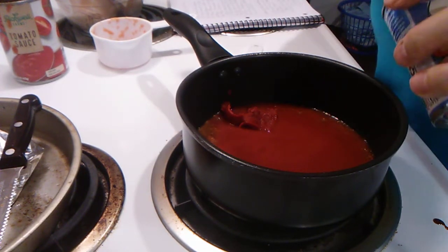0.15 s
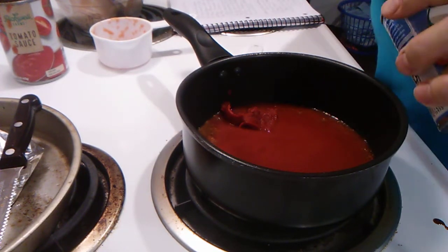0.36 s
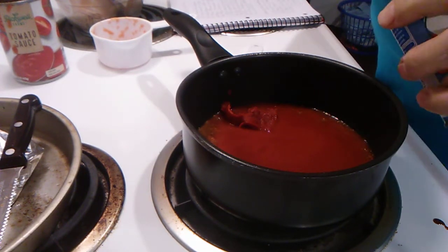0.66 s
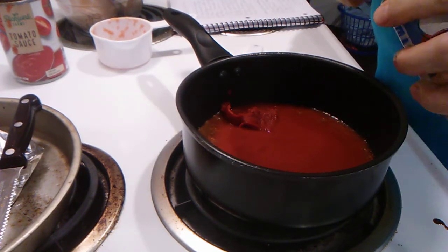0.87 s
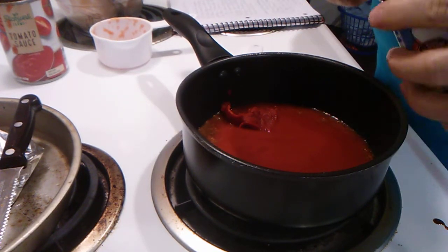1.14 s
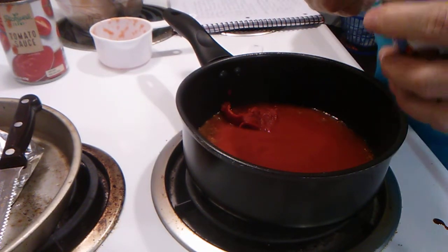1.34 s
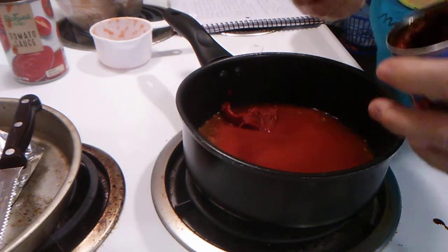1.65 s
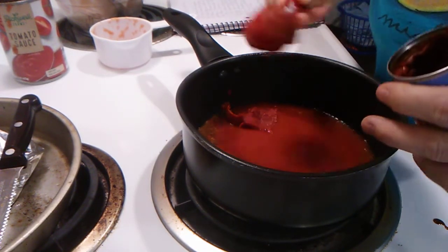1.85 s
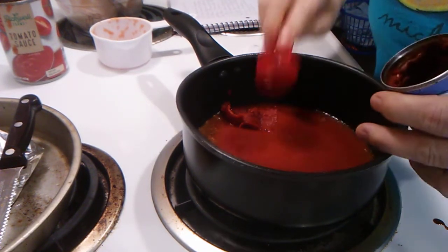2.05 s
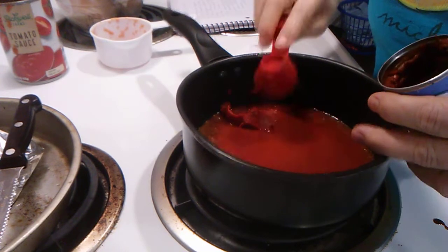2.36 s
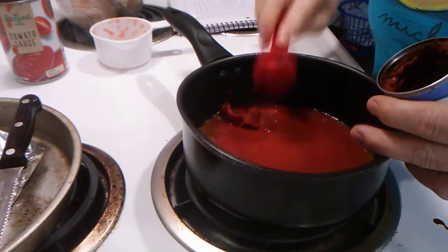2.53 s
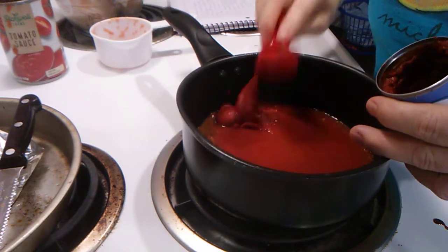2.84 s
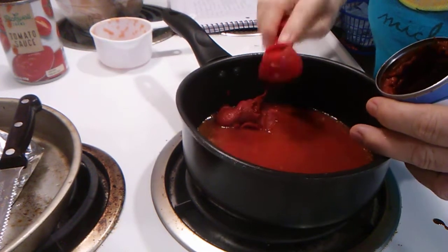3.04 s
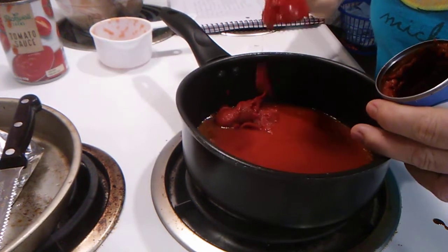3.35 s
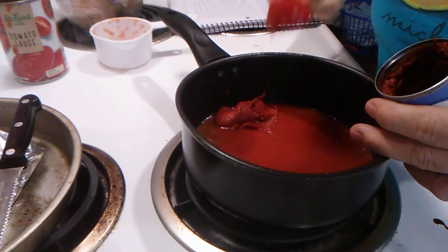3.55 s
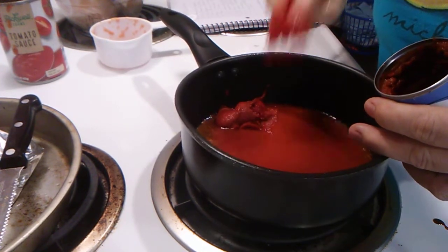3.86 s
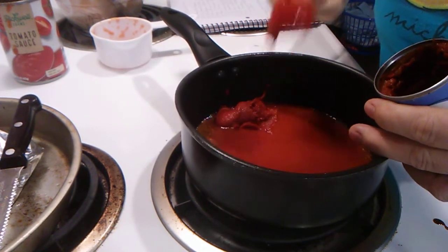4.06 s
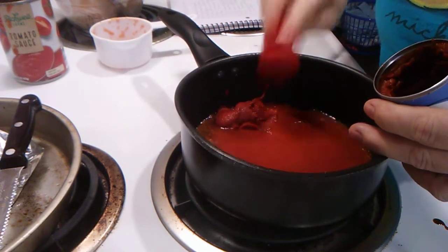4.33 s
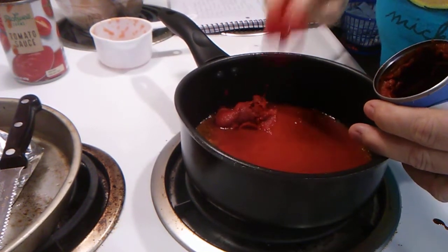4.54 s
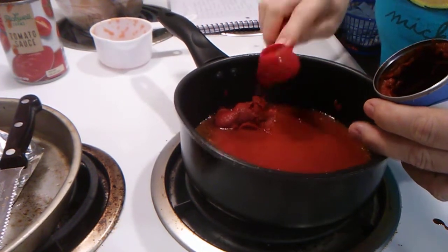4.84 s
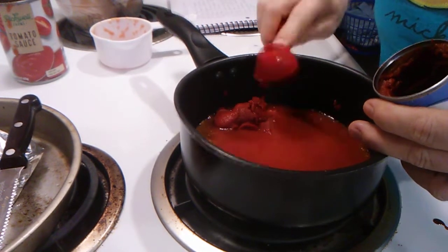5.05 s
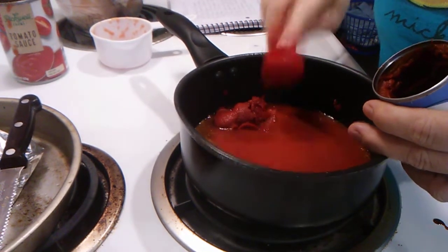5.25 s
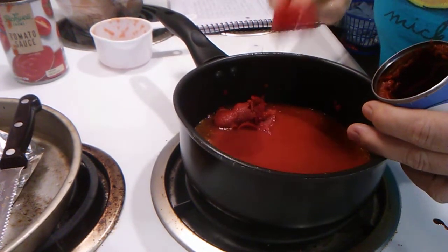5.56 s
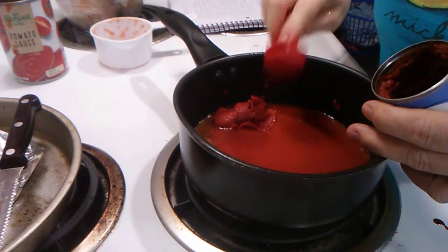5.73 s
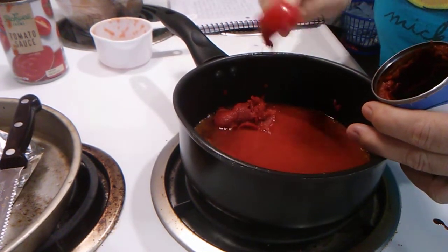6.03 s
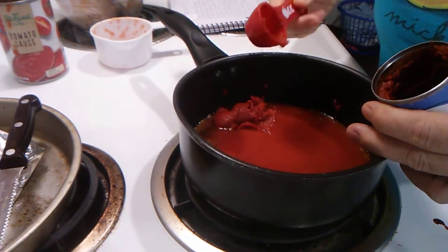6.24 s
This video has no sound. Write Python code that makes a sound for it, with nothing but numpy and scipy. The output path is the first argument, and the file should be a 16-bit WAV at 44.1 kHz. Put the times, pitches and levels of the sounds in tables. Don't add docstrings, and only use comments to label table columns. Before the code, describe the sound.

A metal spoon scrapes fast inside a small paste-lined can, about four bright ringing strokes a second, after two near-silent seconds in a kitchen.

```python
import sys
import numpy as np
from scipy import signal
from scipy.fft import rfft, irfft, next_fast_len
from scipy.io import wavfile
from scipy.ndimage import uniform_filter1d

SR = 44100
rng = np.random.default_rng(int(sys.argv[2]) if len(sys.argv) > 2 else 0)


def inscribe(sig):
    pcm = np.round(np.clip(np.atleast_2d(sig).T, -1, 1) * 32767)
    wavfile.write(sys.argv[1], SR, pcm.astype(np.int16))


def elevation(decibels):
    levels = np.asarray(decibels, float)
    return 10 ** (levels / 20)


N = 281799

# [t/s, peak/dB, hollow knock f/Hz, knock level/dB, rim ring re peak/dB]
STRIKES = [(2.132, -7, 740, -30, -23.5), (2.383, -9, 575, -40, -12), (2.596, -6.5, 680, -38, -22),
           (2.824, -5.5, 601, -30.5, -33.5), (3.043, -5.5, 628, -30.5, -31.5),
           (3.2714, -4, 658, -29.5, -31.5), (3.5016, -2, 714, -22.5, -37.5),
           (3.7315, -3.5, 670, -27.5, -33.5), (3.961, -2.5, 701, -24, -34), (4.177, -4.5, 740, -18, -28),
           (4.4056, -2, 755, -17.5, -30), (4.6268, -1.5, 700, -16, -34), (4.8675, -2, 642, -21.5, -35),
           (5.0842, -0.5, 651, -18, -32), (5.3045, -1.5, 625, -19.5, -32.5), (5.518, 0, 652, -19.5, -32),
           (5.7316, -1, 601, -21.5, -26), (5.9523, -2, 626, -20.5, -25.5)]


def evened(x):
    return x / np.sqrt(np.mean(x ** 2) + 1e-20)


def read(points, hz):
    f, value = np.transpose(points)
    return np.interp(np.log(hz + 1), np.log(f + 1), value)


def add(mix, start_s, sound):
    part = mix[..., round(start_s * SR):][..., :sound.shape[-1]]
    part += sound[..., :part.shape[-1]]


def resonate(x, hz, width_hz):
    return signal.lfilter(*signal.iirpeak(hz, hz / width_hz, SR), x)


def body(x, modes):
    out = 0
    for k, (hz, width_hz, db) in enumerate(modes):
        out = out + (-1) ** k * elevation(db) * resonate(x, hz, width_hz)
    return out


def colour(x, points):
    level_db = read(points, abs(np.fft.fftfreq(4096, 1 / SR)))
    log_gain = np.log(elevation(np.maximum(level_db, -100)))
    taps = np.fft.ifft(np.exp(np.conj(signal.hilbert(log_gain)))).real[:2048]
    return signal.oaconvolve(x, taps[None], axes=1)[:, :N]


def grit(per_s, spread_db, apart_db):
    size = elevation(spread_db * np.minimum(rng.exponential(1, N), 4))
    size = size * (rng.random(N) < per_s / SR)
    common, apart = rng.standard_normal((2, N))
    return evened(size * (common + elevation(apart_db) * apart * np.array([[1], [-1]])))


def metal(x, points, ring_db):
    # [f/Hz, width/Hz, level/dB]
    spoon = [(5490, 58, -5), (6000, 78, 1.5), (6770, 60, 2), (7015, 210, 8.5), (7280, 73, 8),
             (7500, 67, 8.5), (7814, 130, 7), (8180, 110, 6.5), (8260, 90, 2), (8660, 80, 2.5),
             (8810, 63, 4), (9740, 90, -3.5), (10020, 100, -4)]
    return evened(evened(colour(x, points)) + elevation(ring_db) * evened(body(x, spoon)))


def burst(peak_db, ms):
    t = np.arange(2000) / SR
    return elevation(peak_db - 8.0) * (1.0 + 1.6 * np.exp(-t / 0.0015)) / (1 + (t * 1000 / ms) ** 6)


def strikes():
    # [tick re peak/dB, chatter length/ms]
    touch = [(0, 8), (2, 5), (2.5, 5), (4, 5), (1.5, 6), (1.5, 14), (-1.5, 10), (-2, 12), (-2, 14),
             (-1.5, 11), (-2, 13), (1, 13), (-0.5, 15), (-0.5, 9), (0, 13), (-1, 13), (0, 14), (-0.5, 11)]
    # [f/Hz, level per Hz/dB]
    tick_colour = [(800, -25.5), (3000, -12.5), (6000, -3.5), (8000, 0.5), (11000, -7), (14500, -14),
                   (16500, -30), (17500, -60.5)]
    # [f/Hz, level per Hz/dB]
    blow = [(700, -31.5), (1200, -14.5), (2000, -23.5), (3300, -15.5), (5000, -27.5), (6000, -7), (7200, 2),
            (8500, -13), (10000, -11.5), (12000, -21.5), (14000, -23.5), (15600, -42.5)]
    # [f/Hz, width/Hz, level/dB]
    rim_modes = [(4627, 120, 1), (4800, 80, 4)]
    chatter, rim = np.zeros((2, N))
    ticks, knocks = np.zeros((2, 2, N))
    t = np.arange(2000) / SR
    for (s, peak_db, knock_hz, knock_db, rim_db), (tick_db, ms) in zip(STRIKES, touch):
        add(chatter, s - .0002, burst(peak_db - 3.5, ms))
        one_sample_apart = np.array([[0, 0.86], [1, 0]])
        add(ticks, s, elevation(peak_db + tick_db + 12.5) * one_sample_apart)
        add(rim, s, burst(peak_db + rim_db, ms))
        side_phase = np.array([[.6], [-.6]]) * np.minimum(t / 0.0039, 1)
        swing = np.sin(2 * np.pi * knock_hz * t + side_phase)
        add(knocks, s, elevation(knock_db + 6.5 - 60 * t / 0.041) * swing * (1 - np.exp(-t / 0.00099)))
    slips = grit(per_s=18000.0, spread_db=1.0, apart_db=-2.1)
    clang = np.std(slips * chatter) * metal(slips * chatter + ticks, blow, ring_db=-5.0)
    clang = clang + bowl() + elevation(-12.5) * colour(ticks, tick_colour)
    rim_ring = elevation(5.0) * np.std(slips * rim) * evened(body(slips * rim, rim_modes))
    return clang + rim_ring, knocks


def bowl():
    # [t/s, level of the four bowl modes/dB x4]
    rings = [(2.1321, -21.5, -32, -25, -24.5), (2.385, -21, -35, -30, -25),
             (2.596, -16.5, -24.5, -23, -21.5), (2.823, -19, -22, -26, -22.5),
             (3.0427, -17, -21.5, -23, -20.5), (3.2715, -16, -23.5, -19, -21.5),
             (3.5021, -11, -31, -15, -17), (3.7326, -11, -34, -14.5, -17), (3.9612, -11, -34, -15.5, -15.5),
             (4.1782, -13, -29, -16, -16.5), (4.4059, -15, -28.5, -18.5, -19),
             (4.6272, -14, -28, -19, -15.5), (4.8675, -12, -30, -18, -15), (5.0835, -12, -27, -18.5, -14.5),
             (5.3043, -12, -28.5, -19, -16), (5.5179, -10.5, -27, -19, -14.5),
             (5.7311, -10.5, -28, -18.5, -16), (5.9523, -11, -27, -20.5, -17.5)]
    # [f/Hz, t60/s, level/dB]
    modes = [(7275, 0.036, -3), (5900, 0.05, 5), (6900, 0.062, 6), (7590, 0.041, 5.5)]
    damped_ms = 14
    out, t = np.zeros((2, N)), np.arange(2000) / SR
    for s, *levels_db in rings:
        turn = rng.uniform(-1.2, 1, (len(modes), 2))
        for db, (hz, t60_s, mode_db), (detune, apart) in zip(levels_db, modes, turn):
            side_phase = np.array([[1], [-1]]) * (0.71 + .5 * apart)
            swing = np.sin(2 * np.pi * hz * (1 + 0.0027 * detune) * t + side_phase)
            decay = elevation(db + mode_db - 60 * t / t60_s)
            add(out, s, decay * swing / (1 + (t * 1000 / damped_ms) ** 4))
    return out


def scraping():
    # [t/s, peak/dB, can wall share/dB, sharp tap on wall/dB]
    catches = [(2.17, 5.5, -18, -25), (2.1894, -9.5, -19.5, -27), (2.2193, -3, -21, -24),
               (2.2625, -9, -28, -43), (2.4278, -2, -16.5, -24), (2.637, -8.5, -16, -28),
               (2.6547, -5.5, -17.5, -27.5), (2.6903, -12, -19.5, -34), (2.8636, -4.5, -12.5, -24),
               (2.9164, -0.5, -23, -25), (3.1012, 3, -24, -20.5), (3.313, 0, -17, -26.5),
               (3.3306, -1, -13.5, -25.5), (3.3614, -3, -16, -30.5), (3.5433, -4, -9, -23.5),
               (3.5597, -0.5, -17, -21.5), (3.769, -9.5, -11.5, -25), (3.9994, -1.5, -17, -23),
               (4.0435, -5, -22, -31.5), (4.0535, -2, -22, -30.5), (4.4455, -7, -8, -25),
               (4.6501, -0.5, -11, -18), (4.6651, 0, -10, -18.5), (4.9054, 0, -18.5, -19),
               (5.1191, 1.5, -19, -23.5), (5.345, -1.5, -11.5, -20.5), (5.5579, 4.5, -8.5, -16.5),
               (5.5779, -2, -16, -22), (5.7709, -1, -1.5, -22), (5.9909, -7, -3.5, -23),
               (2.8805, -5.5, -17.5, -29.5), (2.903, -7, -20, -30.5), (4.549, -26.5, -15.5, -50.5),
               (4.955, -11, -15, -34.5), (3.0867, -7.5, -17.5, -30), (5.611, -14.5, -14.5, -34)]
    catch_ms = [8, 3.5, 5.5, 5, 6, 5, 6, 6, 4, 7.5, 7, 4.5, 5, 5, 6, 8, 4.5, 6, 4, 4, 5.5, 4.5, 5, 7, 8.5,
                6.5, 5.5, 5, 6.5, 6.5, 2.5, 2, 3.5, 6.5, 5.5, 4]
    # [f/Hz, level per Hz/dB]
    edge_colour = [(2500, -32), (3800, -14.5), (4800, -14), (5500, -9), (6500, -8), (7500, -5.5),
                   (8800, -6), (10000, -13.5), (12000, -16.5), (14000, -23), (14800, -32), (15600, -50)]
    # [f/Hz, width/Hz, level/dB]
    wall_modes = [(885, 260, -5.5), (1156, 150, -3.5), (1360, 164, 1.5), (1558, 101, 3.5), (1775, 280, -3),
                  (2036, 138, 1), (2433, 356, -1.5), (3467, 1630, -2.5), (4240, 1570, -4.5)]
    # [f/Hz, width/Hz, level/dB]
    paste_modes = [(138, 74, -5), (199, 57, -2), (239, 76, 1), (348, 82, 2.5), (401, 61.5, 3.5),
                   (670, 100, -7.5)]
    edge, wall, paste = stroke_gains()
    taps, t = np.zeros(N), np.arange(800) / SR
    for (s, peak_db, wall_db, tap_db), ms in zip(catches, catch_ms):
        add(taps, s, elevation([tap_db + 20.5]))
        catch = elevation(peak_db - 13.5) * np.exp(-(t * 1000 / ms) ** 1.6) * (1 - np.exp(-t / 0.0003))
        add(edge, s, catch)
        add(wall, s, catch * elevation(wall_db + 1.0))

    judder = elevation(1.4 * evened(uniform_filter1d(rng.standard_normal(N), 200)))
    bright = evened(grit(per_s=9000., spread_db=1.5, apart_db=0.2) * judder) * edge * elevation(-0.2)
    bright = bright + elevation(-3.0) * taps
    dull = evened(grit(per_s=5000., spread_db=2.0, apart_db=-3.5) * judder) * wall * elevation(0.6)
    dull_ring = body(dull, wall_modes)
    sound = np.std(bright) * metal(bright, edge_colour, ring_db=-5.0) + np.std(dull) * evened(dull_ring)
    sound = cupped(sound, patchy_db=2.8) + resonate(taps, 1300, 2200)
    sound = sound + np.std(dull) / np.std(dull_ring) * body(taps, wall_modes)
    smack = grit(per_s=2500., spread_db=1.5, apart_db=-23.5) * paste * elevation(-0.5)
    return sound, np.std(smack) * evened(body(smack, paste_modes))


def stroke_gains():
    # [glide t/s, glide level/dB, dig t/s, dig level/dB, 40 dB fade/s]
    strokes = [(2.162, -26.5, 2.176, -17, 0.17), (2.4, -23.5, 2.445, -15, 0.07),
               (2.614, -23.5, 2.664, -17.5, 0.09), (2.87, -20, 2.917, -23.5, 0.05),
               (3.097, -21, 3.104, -18, 0), (3.293, -19, 3.341, -21, 0.08), (3.538, -23, 3.566, -17, 0.07),
               (3.748, -26.5, 3.786, -21.5, 0.0655), (3.983, -24, 4.061, -24, 0.01),
               (4.214, -23.5, 4.262, -19, 0.06), (4.423, -19, 4.49, -22, 0.07),
               (4.669, -20, 4.689, -19.5, 0.05), (4.9, -19.5, 4.91, -13, 0.1257),
               (5.117, -25, 5.123, -13.5, 0.07), (5.335, -22, 5.366, -11.5, 0),
               (5.538, -19.5, 5.582, -16.5, 0.03), (5.751, -17, 5.789, -15, 0.074),
               (5.98, -18, 6.015, -17, 0.056)]
    # [wall gliding/dB, wall digging/dB, paste gliding/dB, paste digging/dB]
    loads = [(-1.5, -10, -7, -15), (-6.5, -9.5, -10.5, -14), (-10.5, -9.5, -13, -15), (-7, -4.5, -15, -14),
             (-9, -12, -21.5, -15.5), (-8, -8.5, -16.5, -16), (-5, -12.5, -23, -20), (-10, -10.5, -21, -27),
             (-5.5, -14, -15, -19.5), (-9, -14, -13.5, -16.5), (-9, -14.5, -19, -17.5),
             (-6, -11, -16, -12.5), (-6, -9, -17, -21.5), (-9.5, -9.5, -17.5, -17.5), (-7.5, -9, -14, -16),
             (-9, -11.5, -17, -12), (-9, -14.5, -14, -17.5), (-6.5, -12.5, -16, -15)]
    settle_s, settle_db = 0.0073, -14
    linger_wall_db, linger_paste_db = 2.5, 8.5
    trail_db, trail_db_per_s = -24.5, -220
    out = np.zeros((3, N))
    for (hit, peak_db, *_), (glide, glide_db, dig, dig_db, fade), load in zip(STRIKES, strokes, loads):
        t = np.arange(hit + settle_s, dig + 0.13, 1 / SR)
        at = [t[0], glide, dig, dig + 2 * fade]
        edge = elevation(np.interp(t, at, [peak_db + settle_db, glide_db, dig_db, dig_db - 2 * 40]))
        edge += (t > dig) * elevation(dig_db + trail_db + trail_db_per_s * (t - dig))
        at[3] = dig + fade / 2
        wall_db = np.interp(t, at, [load[0], load[0], load[1], load[1] + linger_wall_db])
        paste_db = np.interp(t, at, [load[2], load[2], load[3], load[3] + linger_paste_db])
        add(out, t[0], edge * elevation([0 * t, wall_db, paste_db]) * signal.windows.tukey(len(t), .06))
    return out


def cupped(x, patchy_db):
    z = signal.stft(x, nperseg=256)[2]
    patches = rng.standard_normal(z.shape[:0:-1]).T
    patches = evened(uniform_filter1d(uniform_filter1d(patches, 2, 0), 12, 1))
    return signal.istft(z * elevation(patchy_db * patches), nperseg=256)[1][:, :N]


def snap():
    # [t/s, peak/dB, length/ms]
    clicks = [
        (1.3177, -31, 10),
    ]
    # [f/Hz, level per Hz/dB]
    click_colour = [(350, -35), (600, -23), (979, -13), (1450, -22), (1600, -20), (3420, -26.5),
                    (4430, -15), (7840, -2.5), (14100, -20), (15500, -52.5)]
    push = np.zeros(N)
    for s, peak_db, ms in clicks:
        add(push, s, burst(peak_db, ms))
    push = push * grit(per_s=28000.0, spread_db=2.5, apart_db=-1.0)
    ring = evened(resonate(push, 4650, 130))
    return np.std(push) * (evened(colour(push, click_colour)) + elevation(-17.) * ring)


def handling():
    # [f/Hz, width/Hz, level/dB]
    shell = [(1710, 18, 9), (1864, 630, -2.5), (2175, 32, 5), (3040, 100, -10.5), (3450, 87, -7.5),
             (3820, 59, -1.5), (4470, 3400, -15), (5590, 270, -9)]
    # [t/s, level/dB, f/Hz, width/Hz, length/s]
    touches = [
        (0.884, -74, 8240, 600, .03),
        (0.987, -74.5, 7860, 600, 0.037),
        (1.051, -68, 1290, 150, 0.044),
        (1.975, -68, 8500, 3000, 0.04),
        (1.987, -68, 650, 60.1, 0.11),
        (6.329, -72.5, 3000, 3500, .055),
    ]
    brush = grit(per_s=9000.0, spread_db=2.0, apart_db=0.0) * brush_gain()
    out = elevation(-2.5) * np.std(brush) * evened(body(brush, shell))
    for s, db, hz, width_hz, length_s in touches:
        rub = evened(resonate(rng.standard_normal((2, 8000)), hz, width_hz))[:, :round(length_s * SR)]
        add(out, s, elevation(db) * rub * signal.windows.tukey(rub.shape[1], .6))
    return out


def brush_gain():
    # [t/s, level/dB, hold/s, 40 dB fade/s]
    brushes = [
        (.277, -66, .032, .11),
        (.637, -66, .032, 0.25),
        (1.568, -58.5, 0.038, .11),
        (1.708, -57, .045, .13),
    ]
    rise_s = 0.03
    t, gain = np.arange(N) / SR, np.zeros(N)
    for s, db, hold, fade in brushes:
        at = [s - 2 * rise_s, s, s + hold, s + hold + 2 * fade]
        gain += elevation(np.interp(t, at, [db - 82, db, db, db - 80]))
    return gain


def leaned(x):
    # [f/Hz, left minus right/dB]
    lean = [(200, -.5), (700, 1.5), (1290, -2.5), (2380, -.5), (4400, -3), (6500, -5), (9000, -3.5),
            (15000, -2)]
    size = next_fast_len(N)
    half_db = read(lean, np.fft.rfftfreq(size, 1 / SR)) / 2
    return irfft(rfft(x, size) * elevation([half_db, -half_db]), size)[:, :N]


def kitchen(x, count=2):
    # [f/Hz, t60/s]
    decay = [(250, 0.15), (700, 0.12), (2000, 0.18), (4000, 0.19), (6000, .2), (8000, 0.17), (11000, 0.15),
             (14000, 0.125)]
    size = SR // 4
    taps = np.zeros((count, 2, size))
    at = np.arange(100, size - 20, 20) + rng.integers(0, 20, (count, 2, (size - 101) // 20))
    np.put_along_axis(taps, at, rng.choice([-1., 1.], at.shape), 2)
    hz, t, z = signal.stft(taps, SR, nperseg=256)
    tails = signal.istft(z * elevation(-60 * t / read(decay, hz)[:, None]), SR, nperseg=256)[1]
    turn = np.pi * (np.arange(N) / SR / .5 + np.arange(count)[:, None] / count)
    fed = x * np.sqrt(2 / count) * np.sin(turn)[:, None]
    return signal.fftconvolve(fed, tails / np.linalg.norm(tails[0, 0]), axes=2).sum(0)[:, :N]


def air():
    # [f/Hz, level per Hz/dB]
    hiss_colour = [(60, -3.5), (120, 1.5), (250, -5.5), (500, -9), (1000, -11.5), (2000, -20), (4000, -25),
                   (6000, -27.5), (7600, -20), (9500, -28.5), (13000, -37), (15500, -51)]
    # [f/Hz, correlation/1]
    likeness = [(60, 0.9), (180, 0.89), (550, 0.69), (1650, -0.27), (4970, 0.26), (15000, -0.03)]
    # [t/s, level/dB, 25 dB fall either side/s]
    jolt_events = [(.67, -49, 0.06), (1.05, -52.5, 0.13), (1.23, -54, 0.03), (1.68, -53, 0.3),
                   (1.85, -50, 0.08), (2.21, -37.5, 0.09), (2.44, -36.5, 0.12), (2.65, -43.5, 0.1),
                   (2.74, -47, 0.1), (2.85, -45.5, 0.1), (2.97, -38, .07), (3.08, -39.5, 0.04),
                   (3.31, -39, .1), (3.57, -41, 0.1), (3.75, -45, 0.06), (4.05, -52, 0.16),
                   (4.2, -41, 0.08), (4.47, -45, 0.07), (4.65, -30, 0.09), (4.89, -54, 0.3),
                   (5.11, -47.5, 0.08), (5.34, -40.5, 0.1), (5.57, -41.5, 0.1), (5.75, -39.5, 0.08),
                   (5.97, -53, 0.26)]
    hiss_db, rumble_db = -66.5, -63.5
    frames, hz = N // 256 + 5, np.fft.rfftfreq(1024, 1 / SR)
    a, b, c, d, patches = rng.standard_normal((frames, 513, 5)).T
    patches = evened(uniform_filter1d(uniform_filter1d(patches, 12, 0), 10, 1))
    same = np.clip(read(likeness, hz), -1, 1)[:, None]
    left = a + 1j * b
    delay = np.exp(-2j * np.pi * hz[:, None] * .00027)
    right = same * left * delay + np.sqrt(1 - same ** 2) * (c + 1j * d)
    z = np.array([left, right]) * elevation(read(hiss_colour, hz)[:, None] + 0.79 * patches)
    hiss = signal.istft(z, nperseg=1024, noverlap=768)[1][:, :N]

    common, apart = rng.standard_normal((2, N))
    low = np.array([common + 0.15 * apart, common - 0.15 * apart])
    upper = resonate(resonate(low, 78, 45), 84, 45)
    low = resonate(resonate(low, 66, 31), 59, 28) + elevation(-6.) * upper
    low /= np.sqrt(uniform_filter1d(low.mean(0) ** 2, 5000) + 1e-12)
    t = np.arange(N) / SR
    jolts = sum(elevation(db - 25 * abs(t - s) / fall) for s, db, fall in jolt_events)
    return elevation(hiss_db + 3.0) * evened(hiss) + low * (elevation(rumble_db) + jolts)


def scene():
    clang, knock = strikes()
    grate, smack = scraping()
    click = snap()
    high = leaned(clang + grate) + handling() + click
    low = knock * elevation([[1.4], [-1.4]]) + smack * elevation([[.8], [-.8]])
    wet = elevation(-8.0) * high + elevation(-8.0) * low + elevation(-10.0) * click
    return high + low + kitchen(wet) + air()


def topped(x):
    top_hz, sudden_db = 14350, 14
    low = signal.oaconvolve(x, signal.firwin(255, top_hz, window=("kaiser", 7), fs=SR)[None], "same")
    power = (x ** 2).mean(0)
    before = uniform_filter1d(power, size=401, origin=200)[np.maximum(np.arange(N) - 200, 0)]
    jump = uniform_filter1d(power, size=128) > elevation(2 * sudden_db) * before
    is_open = uniform_filter1d(1. * jump, size=150) > 0
    return low + (x - low) * uniform_filter1d(is_open, size=100, output=float)


def starve(x, size=5):
    # [f/Hz, level/dB]
    starved = [(2300, -71), (3000, -37), (3900, -28), (4750, -21), (5300, -45), (6000, -79), (10000, -72),
               (11500, -33), (13000, -27), (14800, -30)]
    hz, t, z = signal.stft(x, SR, nperseg=1024)
    power = (abs(z[:, :510]) ** 2).mean(0).reshape(-1, size, len(t)).mean(1)
    level_db = 10 * np.log10(power + 1e-14)
    fall_db = np.arange(len(t)) * 2.4
    loud_db = np.maximum.accumulate(level_db[len(power) // 5:].max(0) + fall_db) - fall_db
    chance_db = 13.0 * evened(uniform_filter1d(rng.standard_normal(power.shape), 6, 1))
    under_db = loud_db + read(starved, hz[size // 2:510:size])[:, None] + chance_db - level_db
    under_db[len(power) // 2:] += 0.8 * np.minimum(loud_db + 50., 0)
    under_db[:, 2:] *= loud_db[2:] - loud_db[:-2] < 9.
    z[:, :510] *= np.repeat(elevation(-np.clip(7.1 * under_db, 0, 26)), size, 0)
    return signal.istft(z, nperseg=1024)[1][:, :N]


def band_limit(x):
    return signal.sosfilt(signal.butter(12, 15620, fs=SR, output="sos"), x)


def record(dry):
    rounded = 1.047 * np.tanh(dry / 1.135)
    limited = signal.oaconvolve(rounded, signal.firwin(127, 15350, fs=SR)[None], "same")
    return band_limit(np.clip(starve(topped(limited)), -1, 1))


dry = scene()
out = record(dry)
inscribe(out)
```